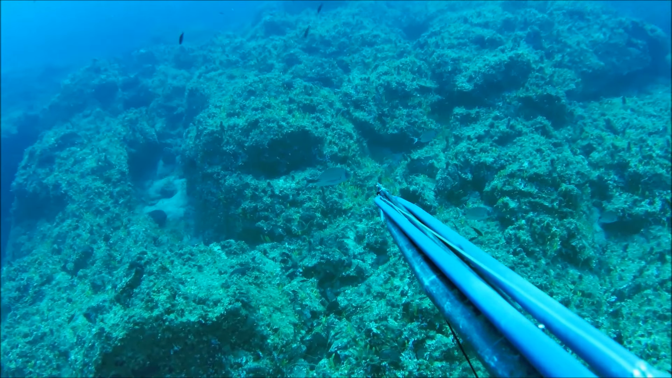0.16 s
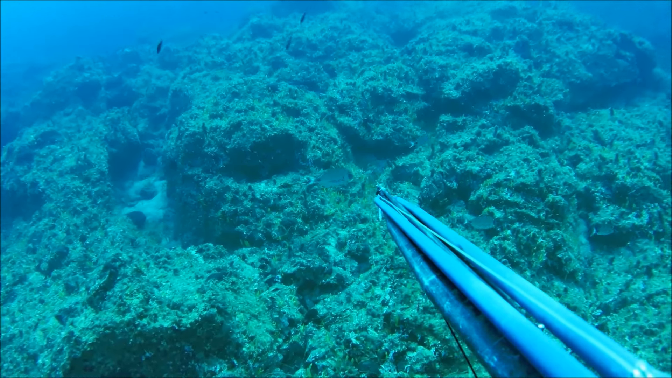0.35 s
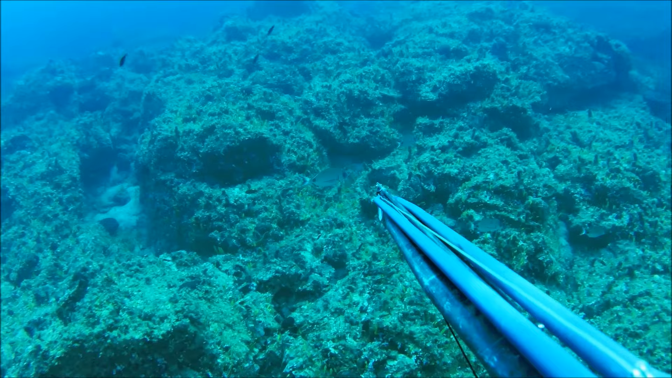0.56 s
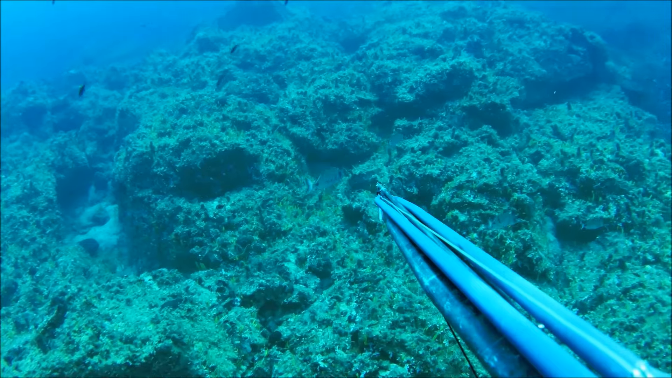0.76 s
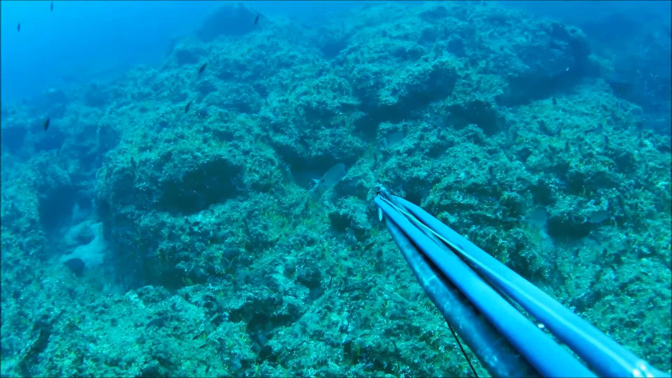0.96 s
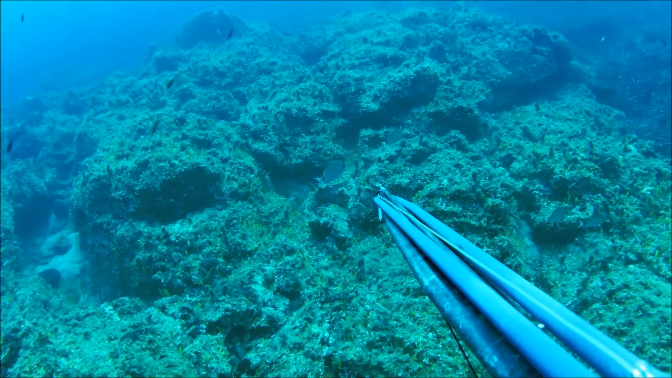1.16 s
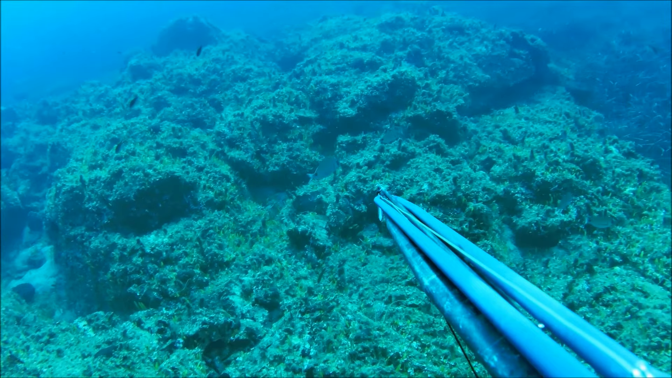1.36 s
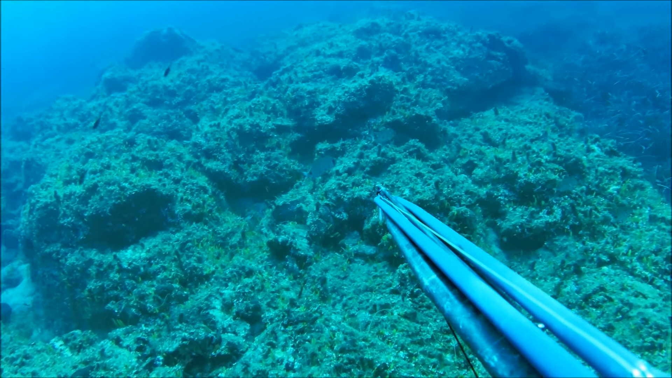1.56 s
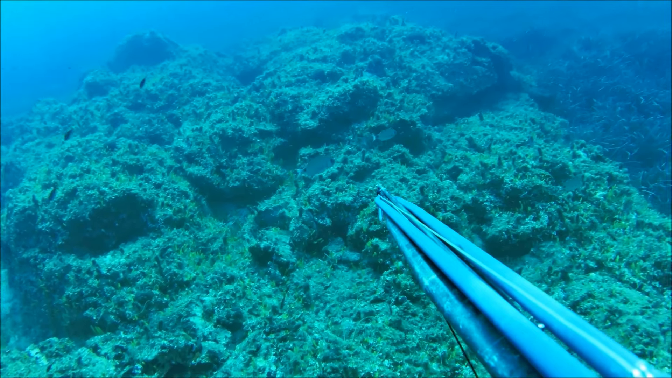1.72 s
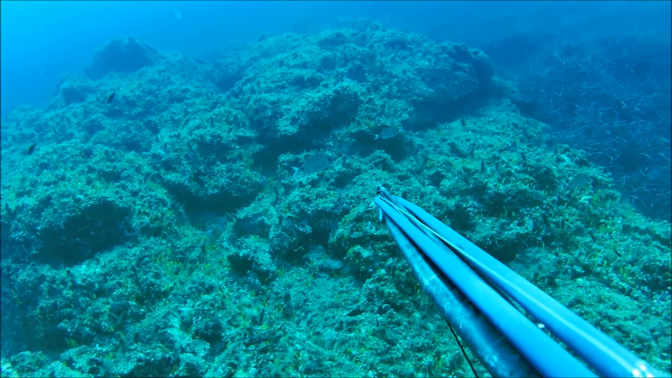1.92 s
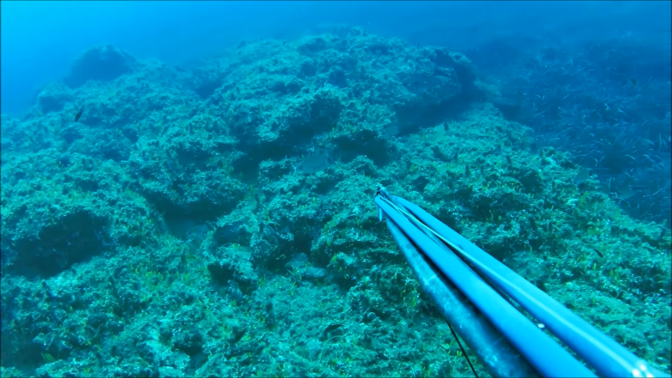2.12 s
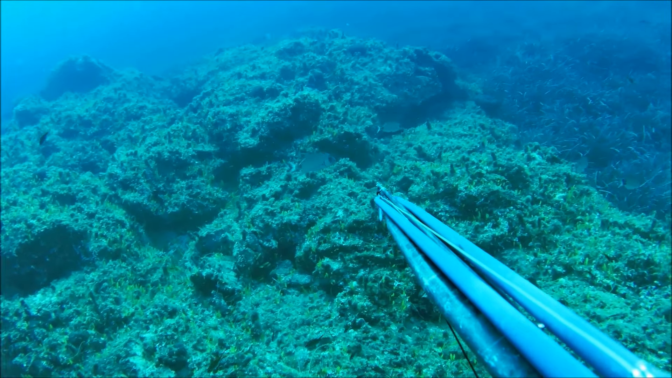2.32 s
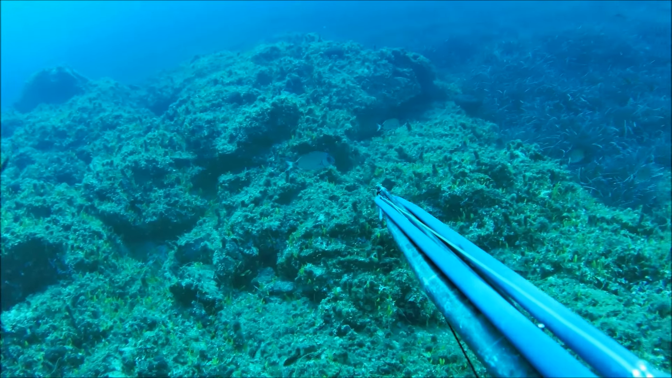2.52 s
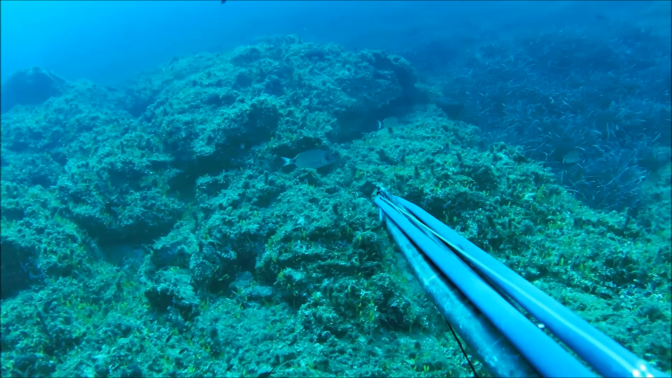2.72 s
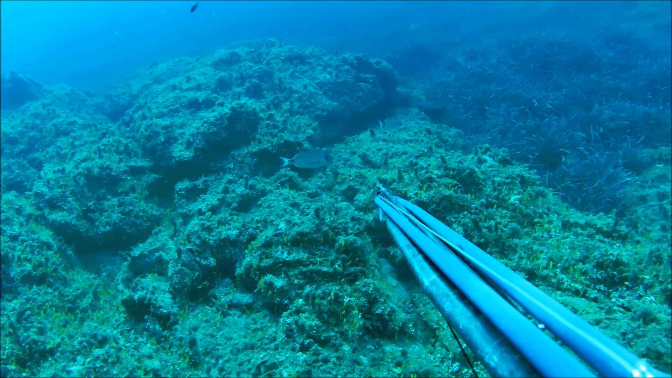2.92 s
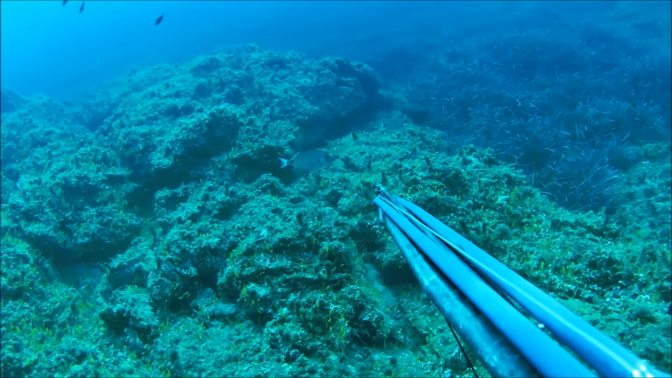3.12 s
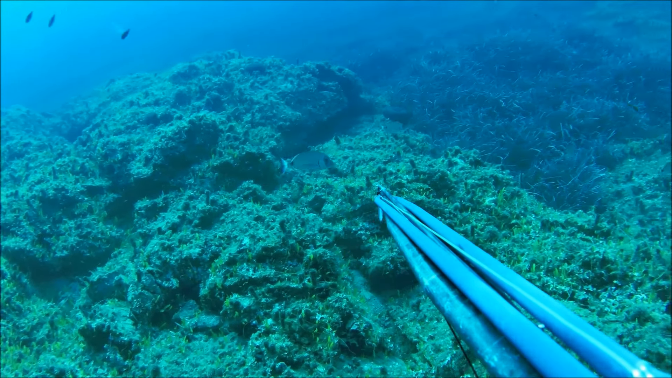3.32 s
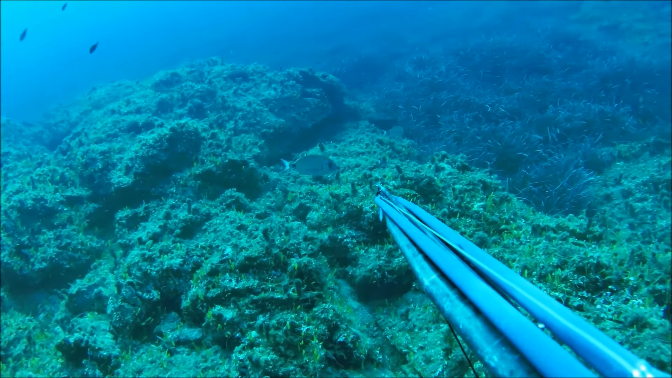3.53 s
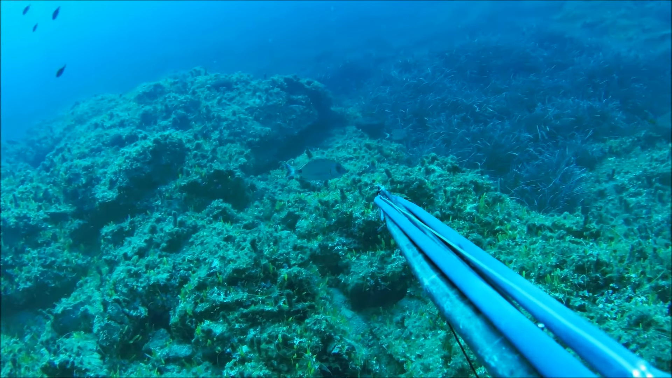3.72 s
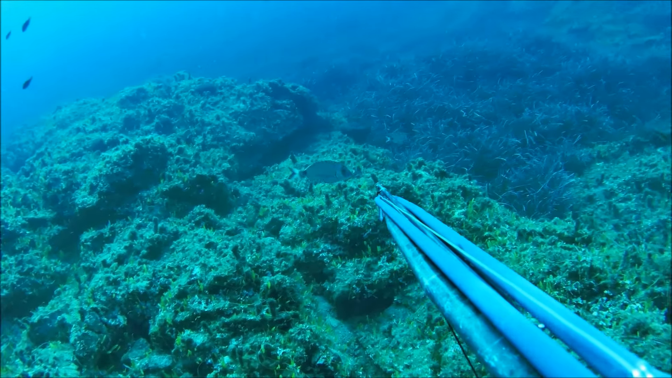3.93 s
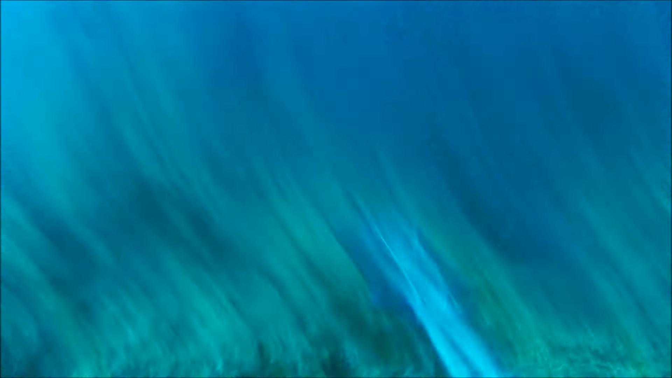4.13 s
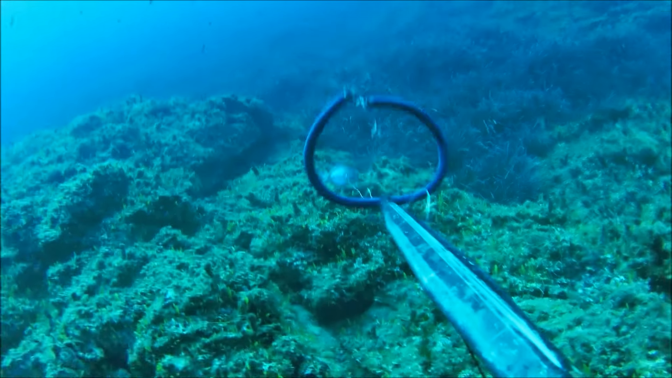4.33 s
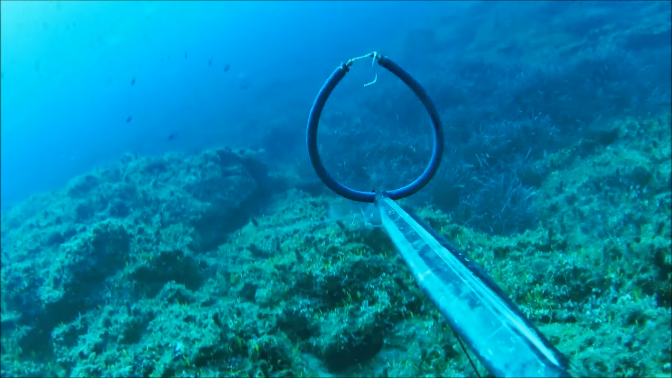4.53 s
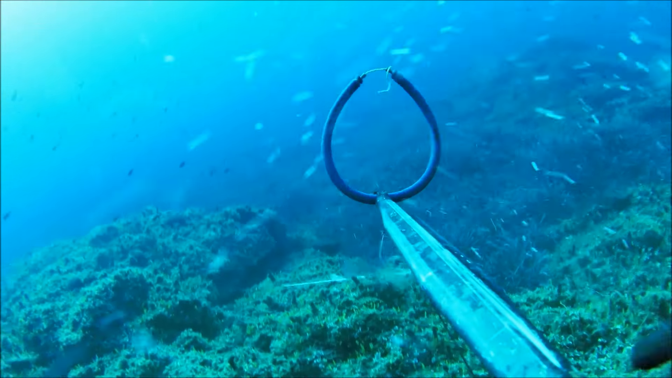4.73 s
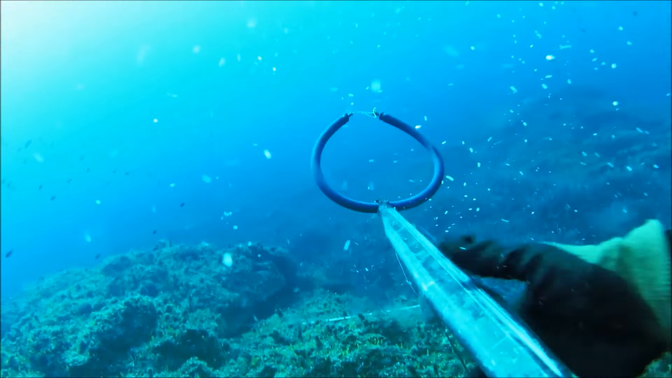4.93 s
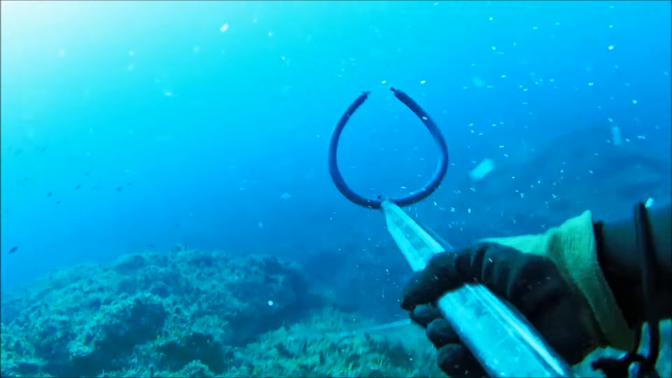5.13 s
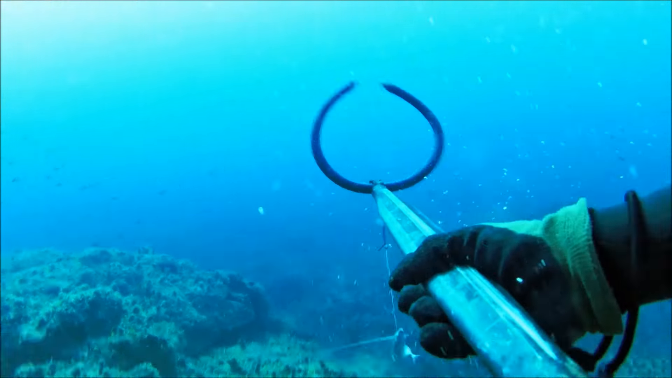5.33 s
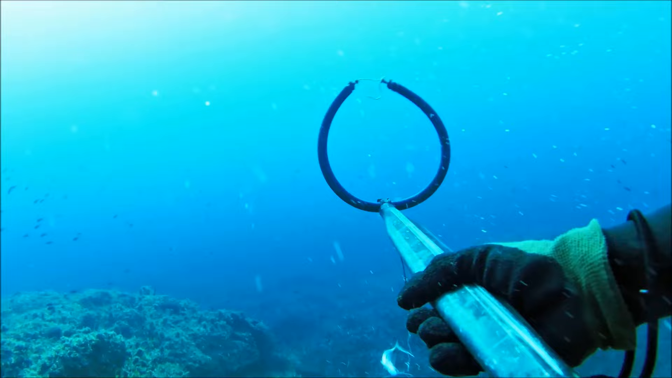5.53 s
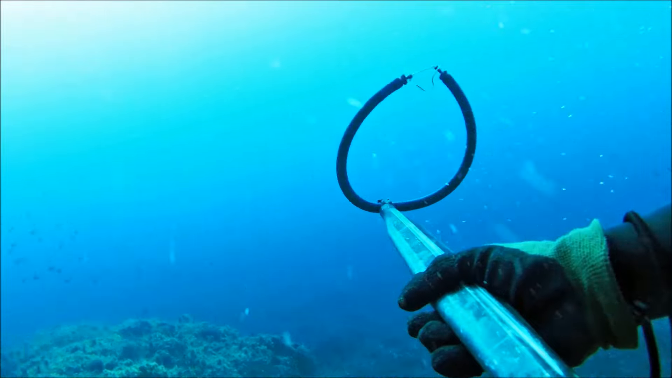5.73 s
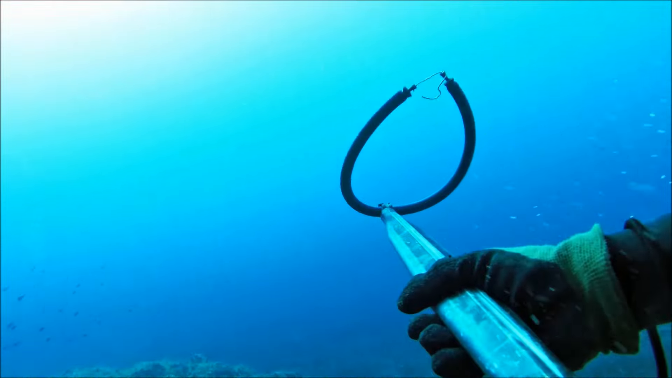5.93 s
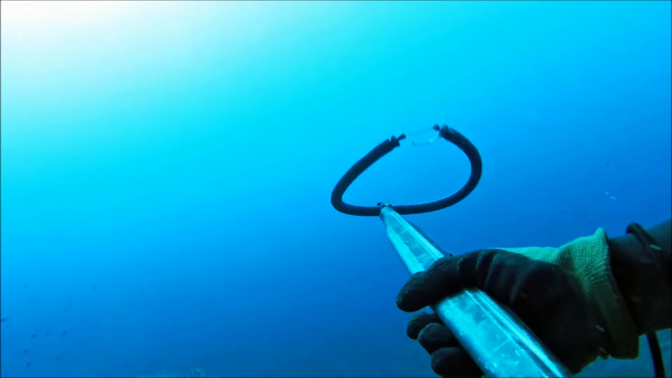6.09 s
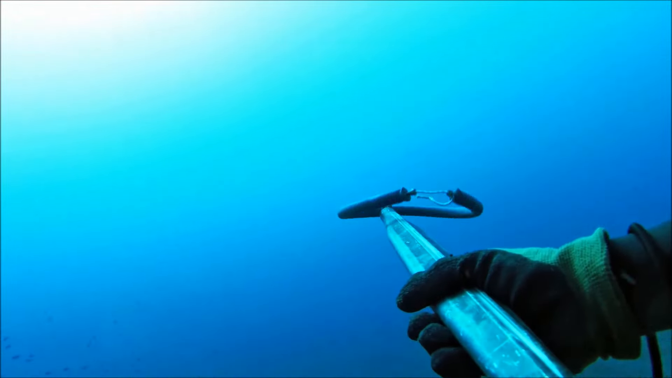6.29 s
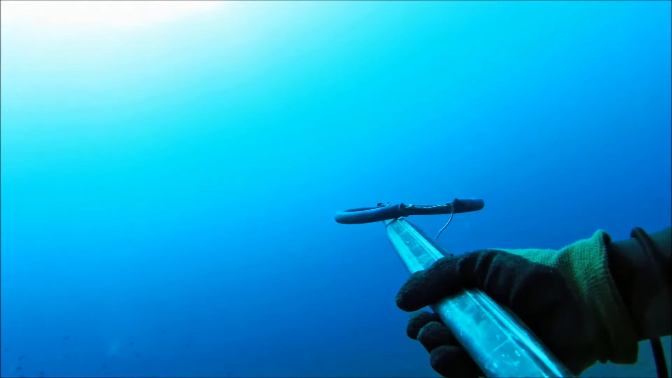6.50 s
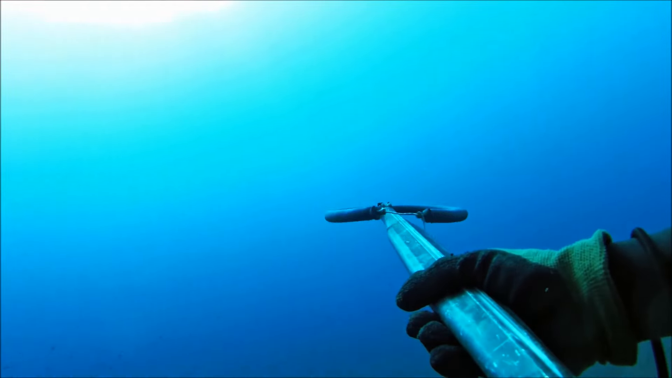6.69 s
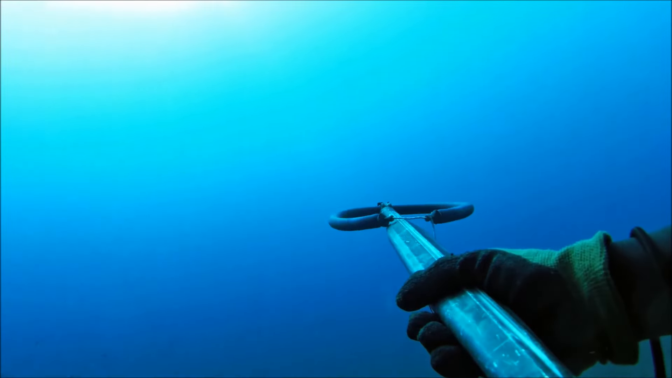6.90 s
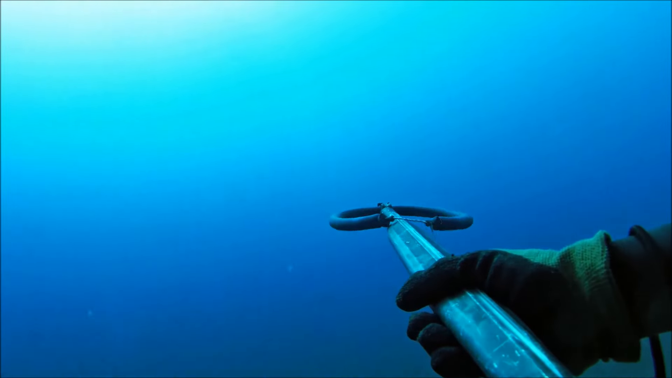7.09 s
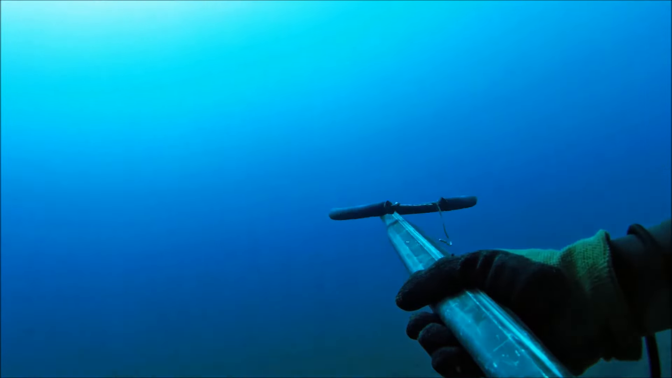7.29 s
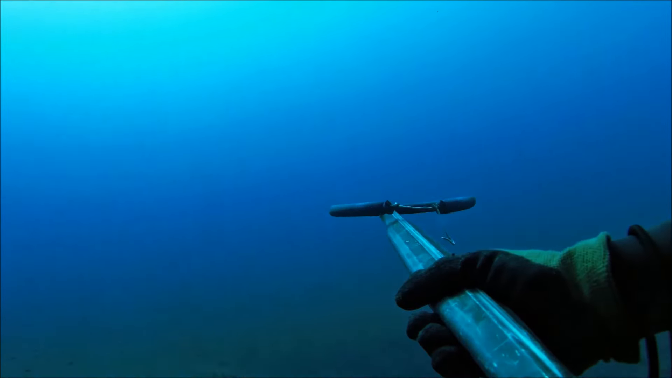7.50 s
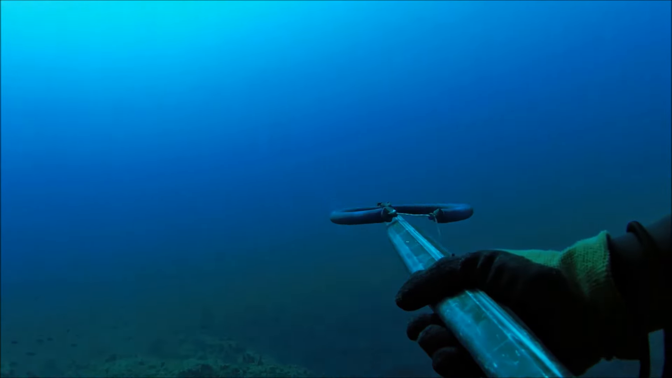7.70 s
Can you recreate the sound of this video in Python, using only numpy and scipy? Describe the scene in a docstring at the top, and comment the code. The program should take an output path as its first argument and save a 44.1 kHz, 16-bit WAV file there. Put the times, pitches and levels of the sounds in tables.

```python
"""Underwater on a reef: a band speargun is fired, heard from inside a waterproof camera case.
The sea hisses, shrimp snap, glove and rubber creak. At 4.3 s the shot overloads the microphone:
the shaft rattles along the barrel and the bands slap home. Shaft, line and hand then knock, scrape
and rub on the gun, steel pings and the slack bands flop down. Everything sounds through the case:
a low thud and a wall ringing near 1 kHz."""
import sys
import numpy as np
from scipy import signal
from scipy.fft import rfft, irfft
from scipy.io import wavfile

SR = 44100
rng = np.random.default_rng(int(sys.argv[2]) if len(sys.argv) > 2 else 0)


def pcm_store(signal):
    """Save signal as 16-bit PCM."""
    levels = np.round(np.clip(np.atleast_2d(signal), -1, 1) * 32767)
    wavfile.write(sys.argv[1], SR, levels.astype(np.int16).T)


N = 341775

# Spectral shapes: f/Hz, relative level/dB
SEA_LOW_SHAPE = [(20, -24.5), (45, -3.5), (105, -8.5), (200, -6), (260, 2), (330, -2.5), (390, -10.5),
                 (465, 0), (530, -8.5), (610, -16.5), (900, -84)]  # water noise through the case
SEA_HIGH_SHAPE = [(480, -29.5), (650, -17.5), (820, 0), (900, -5.5), (1010, 0), (1170, -3), (1330, -18),
                  (1550, -14), (1950, -18), (2280, -13.5), (2800, -25), (3900, -29.5), (4700, -30),
                  (7500, -43.5), (15000, -65)]  # far shrimp through the case
SNAP_SHAPE = [(800, -31.5), (1700, -4.5), (2300, 8.5), (3000, -4), (4000, -5.5), (4700, 5.5), (6200, -5.5),
              (9000, -38.5), (14000, -44.5)]  # near shrimp
SWAY_SHAPE = [(25, -25.5), (42, -1), (85, 0.5), (130, -9.5), (250, -21), (600, -67.5)]  # gun sway
BODY_SHAPE = [(30, -5), (110, -18.5), (180, 12), (300, 5), (430, 1.5), (600, -19), (900, -54), (2000, -87)]  # case body
WALL_SHAPE = [(100, -54), (600, -17.5), (800, -2.5), (980, 3), (1130, -4), (1320, -34), (1550, -30.5),
              (2250, -28.5), (2800, -55), (4600, -49.5), (8000, -80), (15000, -104)]  # case wall
TICK_SHAPE = [(300, -20.5), (1000, -18), (1400, -12), (1900, -9), (2300, -1.5), (2800, -4.5), (3800, -8.5),
              (4900, -6), (6200, -15.5), (8500, -33.5), (15000, -62)]  # water-borne clicks
SCRAPE_SHAPE = [(600, -2), (1400, 2), (2300, 1), (3100, -4.5), (4600, -15.5), (6200, -29), (8000, -32.5),
                (14000, -61.5)]  # sliding on steel

# Glove and rubber stick-slip: centre t/s, level/dB, length/s, f/Hz
RUBBER_CREAKS = [(0.254, -42.5, 0.079, 995), (.482, -35.5, 0.017, 1000), (0.498, -26, 0.0122, 980),
                 (0.51, -25.5, 0.031, 1001), (0.538, -34.5, 0.075, 947), (4.97, -16.5, 0.0096, 1050),
                 (6.099, -23, .04, 226), (6.139, -23, .025, 220), (6.152, -17, 0.022, 759),
                 (6.162, -20, 0.032, 922), (6.231, -26, 0.031, 1072), (6.586, -30, 0.0076, 920),
                 (7.056, -34.5, 0.021, 874)]
# Shaft and line hitting the gun: t/s, thud/dB, thud f/Hz, clack/dB
HARD_KNOCKS = [(.51, -20, 165, -23.5), (2.059, -21, 234, -84), (4.246, -26, 240, -30), (4.458, -5, 209, 0),
               (4.484, -1, 350, -11), (4.513, 0, 291, -22), (4.537, -9.5, 320, -6),
               (4.7365, -21.5, 268, -16.5), (4.892, -8.5, 199, -22), (4.949, -2.5, 314, -4.5),
               (4.957, -6.5, 303, -7.5), (5.039, -22, 300, -18), (5.138, -17.5, 184, -21),
               (5.163, -29, 279, -16), (5.199, -4.5, 265, -8.5), (5.217, -3, 298, 4.5),
               (5.237, -9, 222, -17), (5.259, 5.5, 207, 1.5), (5.35, 0, 223, -19), (5.372, -7.5, 270, -21),
               (5.396, -16, 266, -10), (5.51, 8.5, 278.5, 5), (5.535, 1.5, 295, 0), (5.594, 3, 204, -8.5),
               (5.646, -16.5, 290, -25), (5.679, -16.5, 285, -24), (5.718, -24, 250, -21)]
# Glove and line strokes: start t/s, length/s, body level/dB, wall rasp/dB re body
GUN_RUBS = [(4.231, 0.074, -33.5, 3.5), (4.572, 0.29, -37.5, -2.5), (4.854, 0.17, -19.5, -11),
            (5.014, 0.18, -28, -9.5), (5.188, 0.073, -16.5, -5), (5.366, 0.11, -19, -12.5),
            (5.46, .1, -23, 2.5), (5.598, 0.045, -25, -28), (5.739, 0.17, -29, -2.5),
            (5.907, 0.18, -37.5, -2.5), (6.031, .12, -19, -11), (6.117, 0.13, -22, -5),
            (6.532, .17, -33.5, -16), (6.717, 0.087, -31.5, -15), (7.04, 0.073, -37.5, -13),
            (7.275, 0.16, -34.5, -12.5)]
# Unloaded gun swinging, water pushing on the case: centre t/s, level/dB, length/s
GUN_SWINGS = [(4.68, -37, 0.24), (4.972, -35, 0.57), (5.396, -31, 0.47), (5.98, -41.5, 1.25),
              (6.057, -25, .05), (6.641, -24.5, 0.15), (6.808, -32, 0.38), (7.134, -33, 0.25),
              (7.366, -39, 0.47)]
# Glove and rubber blows: t/s, level/dB, f/Hz
SOFT_BUMPS = [(.528, -26.5, 177), (.556, -27.5, 162), (.585, -29.5, 163), (.787, -30.5, 265),
              (4.262, -15, 308), (4.905, -11, 230), (4.998, -15, 346), (5.052, -9, 314), (5.065, -5.5, 303),
              (5.25, 0.5, 300), (5.275, -7, 190), (5.315, -13, 278), (5.515, 13, 285.5), (6.092, -16, 256),
              (6.765, -19, 205), (7.24, -19, 264), (7.365, -25, 223), (7.405, -20, 242), (7.419, -21, 226)]
# Water-borne clicks: t/s, relative tick level/dB, clack/dB
WATER_TICKS = [(1.2521, -30.5, -52), (1.848, -33, -53), (2.1584, -31, -57), (2.7826, -37, -56),
               (3.2919, -33.5, -56), (4.336, -9.5, -12), (4.5522, -29, -52), (4.7087, -12, -15.5),
               (4.85, -16, -15.5), (4.8658, -23.5, -41), (5.2611, -39, -58), (5.5164, 1, -52),
               (5.792, -28, -45.5), (6.2417, -28, -27), (6.6488, -35.5, -49), (6.9992, -16, -39),
               (7.5973, -21, -30)]
# Line and shaft sliding on steel: centre t/s, level/dB, length/s
STEEL_SCRAPES = [(4.301, -8.5, 0.017), (4.314, -16, 0.032), (4.344, -1.5, 0.0085), (4.37, -13, 0.048),
                 (4.407, 4.5, 0.0068), (4.437, -17.5, .022), (4.49, -45, 0.048), (4.851, -20.5, 0.018),
                 (4.955, -39.5, 0.031), (5.078, -39.5, 0.012), (5.202, -41, .012), (5.219, -15, .008),
                 (5.253, -30, .04), (5.479, -44, 0.095), (5.532, -18, 0.07), (5.581, -38, .024),
                 (5.802, -42.5, 0.024), (6.19, -53, 0.13), (6.243, -26, 0.0064)]
# Release, shaft rattle, band slap: t/s, thud/dB, thud f/Hz, clack/dB
SHOT_BLOWS = [(4.2968, 5, 306, 9), (4.303, 3.5, 122, 8), (4.310, 2, 133, 7), (4.321, 15.5, 137, 12.5),
              (4.327, 10, 256, 9), (4.334, 7, 297, 13), (4.348, 11, 354, 9), (4.358, 5.5, 264, 1.5),
              (4.369, 7, 312, 2.5), (4.380, 19.5, 298, 10.5), (4.392, 20, 151.4, 5), (4.400, 1, 255, 17.5),
              (4.408, 1, 207, 13), (4.4205, 0.5, 270, 15.5)]
# Light metal touches: t/s, level/dB
STEEL_PINGS = [(5.732, -57), (5.791, -44)]
# Slack bands landing: t/s, level/dB, f/Hz, bounce gap/s
BAND_FLOPS = [(6.591, -9.5, 237, 0.018), (6.794, -18.5, 197, 0.024), (7.077, -29, 210, .026)]


def amp(db):
    return 10 ** (np.asarray(db) / 20)


def unit_rms(x):
    return x / np.sqrt(np.mean(x ** 2) + 1e-20)


def unit_peak(x):
    return x / (abs(x).max() + 1e-20)


def add(mix, start_s, sound):
    part = mix[max(round(start_s * SR), 0):][:len(sound)]
    part += sound[:len(part)]


def response(shape, size=4096):
    """Minimum-phase impulse response of a spectral shape."""
    hz, db = np.transpose(shape)
    bins_hz = np.fft.rfftfreq(size, 1 / SR)
    log_gain = np.log(amp(np.interp(np.log(bins_hz + 1), np.log(hz), db)))
    mirrored = np.concatenate([log_gain, log_gain[-2:0:-1]])
    return np.fft.ifft(np.exp(signal.hilbert(mirrored).conj())).real[:size // 2]


def colour(x, shape):
    """x filtered by a shape; rms 1."""
    return unit_rms(signal.oaconvolve(x, response(shape))[:len(x)])


def drift(cutoff_hz):
    """Slow noise; rms 1."""
    spectrum = rfft(rng.standard_normal(N))
    return unit_rms(irfft(spectrum * (np.fft.rfftfreq(N, 1 / SR) < cutoff_hz), N))


def grains(per_s, spread_db):
    """Random clicks, mostly small; rms 1."""
    sizes = amp(spread_db * np.minimum(rng.exponential(1, N), 5)) * rng.choice([-1, 1], N)
    return unit_rms(sizes * (rng.random(N) < per_s / SR))


def contact(ring, chatter, chatter_s, size=2048):
    """An impulse and its dying chatter excite the response `ring`; peak 1."""
    t = np.arange(size) / SR
    force = chatter * rng.standard_normal(size) * np.exp(-t / chatter_s)
    force[0] += 1
    return unit_peak(signal.fftconvolve(force, ring))


def swell(length_s):
    return np.hanning(max(round(length_s * SR), 3))


def sea(low_db=-47, high_db=-48.5, snaps_db=-70, patches=8):
    """Water noise, merged crackle of far shrimp, single nearer snaps."""
    low = amp(low_db + 1.1 * drift(2.5)) * colour(rng.standard_normal(N), SEA_LOW_SHAPE)
    crackle = grains(per_s=2100, spread_db=0.5) + 0.77 * rng.standard_normal(N)
    high = amp(high_db + 0.7 * drift(19)) * colour(crackle, SEA_HIGH_SHAPE)
    snaps = np.zeros(N)
    for _ in range(patches):  # each reef patch has its own echoes
        snap = contact(response(SNAP_SHAPE), chatter=0.15, chatter_s=0.002)
        snaps += signal.oaconvolve(grains(per_s=21, spread_db=5.5), snap)[:N]
    return low + high + amp(snaps_db) * unit_rms(snaps)


def creaks(jitter=0.054):
    """Glove and rubber stick and slip; each slip sings at an unsteady pitch."""
    out = np.zeros(N)
    waver = 1 + jitter * drift(140)
    for s, db, length_s, hz in RUBBER_CREAKS:
        level = amp(db) * swell(length_s)
        cycles = np.cumsum(hz * waver[round(s * SR):][:len(level)]) / SR
        add(out, s - length_s / 2, level * np.sqrt(2) * np.sin(2 * np.pi * cycles))
    return out


def thud(hz, t60_s, rise_s=0.0023, sag=0.093, sag_s=0.0092, slow_db=-13):
    """Damped mode of gun and case, sagging through hz, over a slower swing of the whole gun."""
    t = np.arange(SR // 3) / SR
    pitch_hz = hz * (1 + sag * (np.exp(-t / sag_s) - 0.5))
    phase = 2 * np.pi * np.cumsum(pitch_hz) / SR
    swing = np.sin(phase) + amp(slow_db) * np.sin(phase * rng.uniform(0.33, 0.651))
    attack = 1 - np.exp(-(t / rise_s) ** 2)
    return unit_peak(swing * attack * amp(-60 * t / t60_s))


def blows(rows, t60_s, chatter, chatter_s, crack_re_clack_db):
    """Each blow: a thud, a clack of the case wall, a bright crack."""
    out, wall, tick = np.zeros(N), response(WALL_SHAPE), response(TICK_SHAPE)
    for s, thud_db, hz, clack_db in rows:
        add(out, s, amp(thud_db) * thud(hz, t60_s))
        add(out, s, amp(clack_db) * contact(wall, chatter, chatter_s))
        add(out, s, amp(clack_db + crack_re_clack_db) * contact(tick, chatter, chatter_s))
    return out


def knocks():
    """Shaft and line strike the gun: hard, little chatter."""
    return blows(HARD_KNOCKS, t60_s=0.032, chatter=0.078, chatter_s=0.0022, crack_re_clack_db=-50)


def stroke(length_s, rise_share=0.52, release_s=0.012):
    """Rub envelope: rise, hold, release."""
    t = np.arange(round((length_s + 0.2) * SR)) / SR
    rise = np.minimum(t / (rise_share * length_s), 1)
    return rise * np.exp(-np.maximum(t - length_s, 0) / release_s)


def lingering(impacts, settle_s=0.025):
    """Running rms: the shaking left by blows as their energy decays."""
    pole = np.exp(-1 / (settle_s * SR))
    return np.sqrt(signal.lfilter([1 - pole], [1, -pole], impacts ** 2 + 1e-14))


def handling(impacts, shake_sway_db=-18.5, shake_body_db=-14.5, shake_wall_db=-23.5, muffle_hz=2000):
    """Clumped slips of line and glove drive gun, case body and wall in swings, rubs and after blows."""
    swing, rub, rasp = np.zeros((3, N))
    for s, db, length_s in GUN_SWINGS:
        add(swing, s - length_s / 2, amp(db) * swell(length_s))
    for s, length_s, db, rasp_db in GUN_RUBS:
        add(rub, s, amp(db) * stroke(length_s))
        add(rasp, s, amp(db + rasp_db) * stroke(length_s))
    shake = lingering(impacts)
    slips = grains(per_s=1000, spread_db=1.3) * amp(1.9 * drift(37))
    sway = np.hypot(swing, amp(shake_sway_db) * shake) * colour(slips, SWAY_SHAPE)
    body = np.hypot(rub, amp(shake_body_db) * shake) * colour(slips, BODY_SHAPE)
    wall = np.hypot(rasp, amp(shake_wall_db) * shake) * colour(slips, WALL_SHAPE)
    return signal.lfilter(*signal.butter(2, muffle_hz, fs=SR), sway + body) + wall


def padded(rows, t60_s, clack_re_thud_db=-18.5):
    """Soft blows: thuds with a trace of clack."""
    hits = [(s, db, hz, db + clack_re_thud_db) for s, db, hz in rows]
    return blows(hits, t60_s, chatter=0.082, chatter_s=0.014, crack_re_clack_db=-41.5)


def bumps():
    """Glove and rubber bump the gun; longer ring than a knock."""
    return padded(SOFT_BUMPS, t60_s=0.093)


def ticks(tick_trim_db=-6):
    """Sharp clicks travel through the water and ring the case wall."""
    out, wall, tick = np.zeros(N), response(WALL_SHAPE), response(TICK_SHAPE)
    for s, tick_db, clack_db in WATER_TICKS:
        add(out, s, amp(tick_db + tick_trim_db) * contact(tick, chatter=0.93, chatter_s=0.0016))
        add(out, s, amp(clack_db) * contact(wall, chatter=0.03, chatter_s=0.0014))
    return out


def scrapes():
    """Line and shaft run over steel: short swells of dense grit."""
    level = np.zeros(N)
    for s, db, length_s in STEEL_SCRAPES:
        add(level, s - length_s / 2, amp(db) * swell(length_s))
    return level * colour(grains(per_s=4400, spread_db=5.5), SCRAPE_SHAPE)


def shot():
    """Release, shaft rattling along the barrel, bands slapping home."""
    return blows(SHOT_BLOWS, t60_s=0.036, chatter=0.23, chatter_s=0.0035, crack_re_clack_db=-23.5)


def pings(hz=4250, t60_s=0.13):
    """Light touches ring one mode of the steel wishbone."""
    out, t = np.zeros(N), np.arange(SR // 3) / SR
    ring = np.sin(2 * np.pi * hz * t) * amp(-60 * t / t60_s)
    for s, db in STEEL_PINGS:
        add(out, s, amp(db) * ring)
    return out


def flops(landings=3, step_db=-2, pitch_ratio=0.69):
    """Slack bands land on the barrel and bounce, each time softer and lower."""
    bounces = [(s + k * gap_s, db + k * step_db, hz * pitch_ratio ** k)
               for s, db, hz, gap_s in BAND_FLOPS for k in range(landings)]
    return padded(bounces, t60_s=0.034)


def scene():
    """Gun sounds over the sea, mono; only hard blows leave the gun shaking."""
    hard = shot() + knocks()
    soft = bumps() + flops()
    return (hard + soft + ticks() + pings() + scrapes() + creaks() + handling(hard) + sea())[None]


def record(dry, fall_db_per_s=170, recover_db_per_s=42, max_duck_db=13,
           leak_hz=22, dull_hz=8500, edge_hz=15800):
    """Gain falls on overload and creeps back; the excess clips; then a band limit."""
    overload = abs(dry[0]) > 1
    ramp_db = np.cumsum(np.where(overload, fall_db_per_s, -recover_db_per_s)) / SR
    duck_db = np.minimum(ramp_db - np.minimum.accumulate(ramp_db), max_duck_db)
    driven = dry * amp(-duck_db)
    clipped = driven / (1 + driven ** 16) ** (1 / 16)
    # input stage: flat tops round off and droop
    shaped = signal.lfilter(*signal.butter(1, [leak_hz, dull_hz], "bandpass", fs=SR), clipped)
    lowpass = signal.firwin(511, edge_hz, window=("kaiser", 8), fs=SR)
    return signal.oaconvolve(np.clip(shaped, -1, 1), lowpass[None], "same")


dry = scene()
out = record(dry)
pcm_store(out)
```